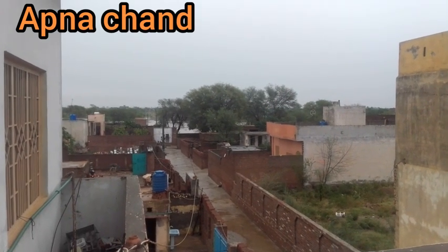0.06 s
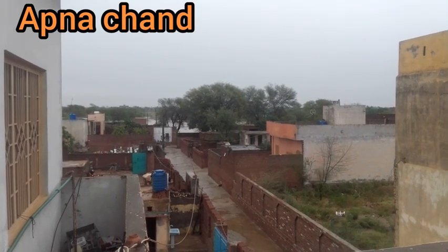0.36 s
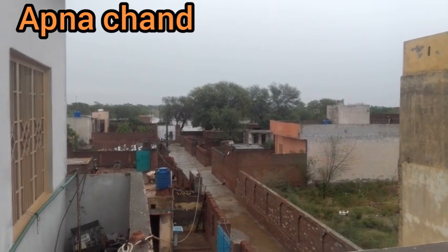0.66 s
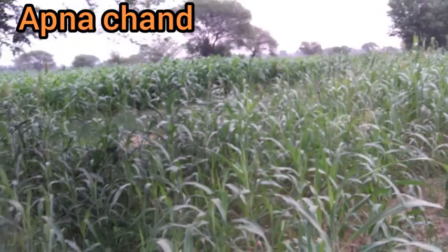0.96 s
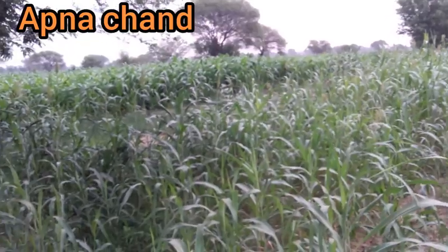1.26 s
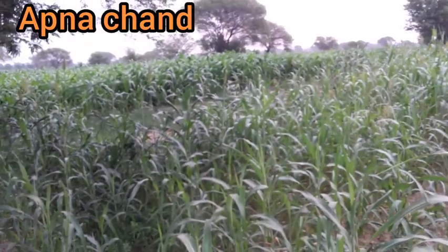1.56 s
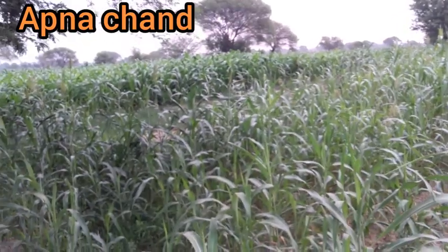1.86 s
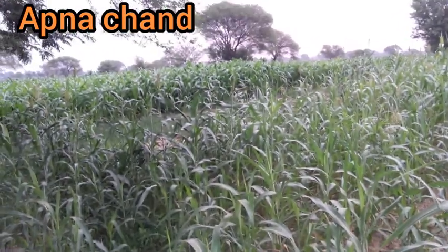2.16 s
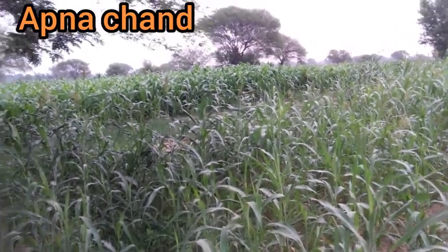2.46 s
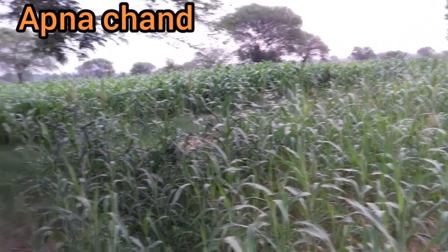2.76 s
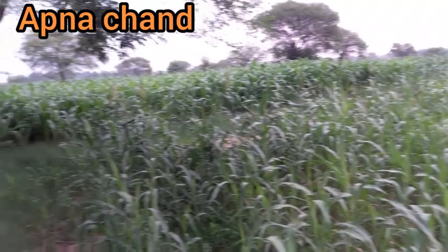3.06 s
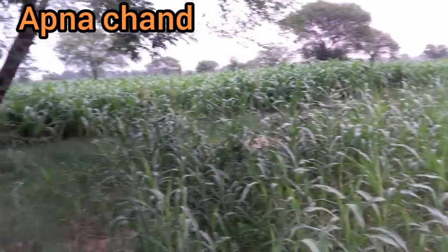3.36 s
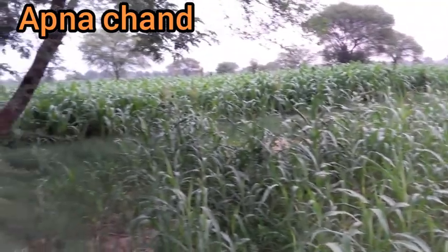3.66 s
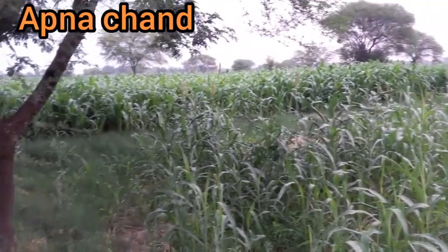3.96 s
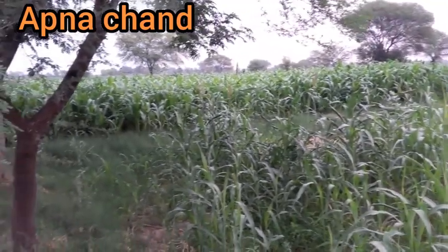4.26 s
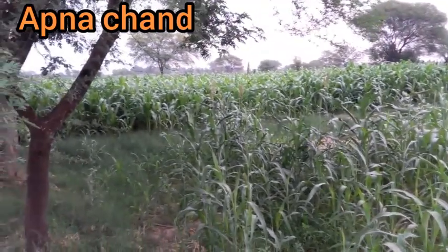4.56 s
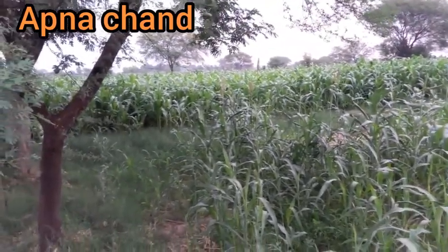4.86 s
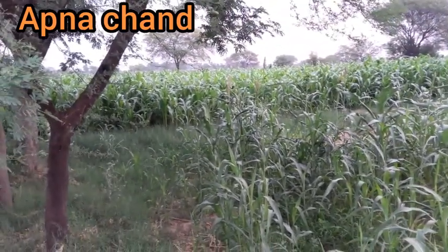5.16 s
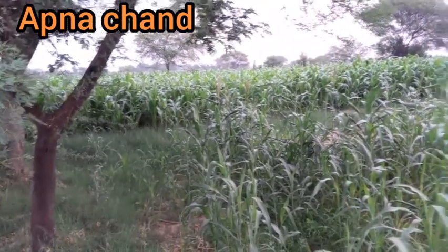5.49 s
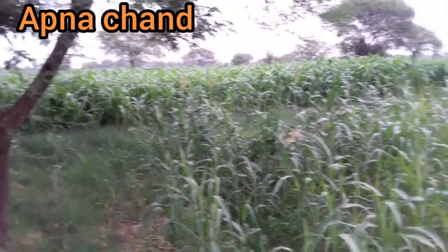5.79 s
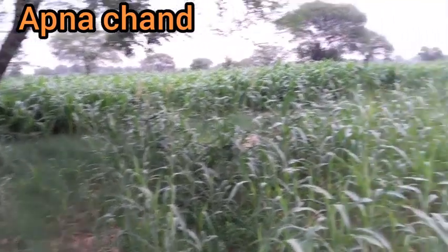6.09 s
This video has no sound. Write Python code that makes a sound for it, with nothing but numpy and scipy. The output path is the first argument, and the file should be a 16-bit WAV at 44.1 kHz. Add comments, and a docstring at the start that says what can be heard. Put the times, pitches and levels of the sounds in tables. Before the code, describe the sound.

After a brief windy village din stops abruptly, crows caw near and far in a field with quiet insects and high trills.

```python
"""Village rooftop, then crows in a crop field

A far drone wavers, wind thumps the microphone and small birds chirp, until the sound cuts off.
A field fades in: a crow caws close by and others answer from farther off, pulses ringing their throats,
over buzzing insects, high trills, thin whistles and a few taps. Noise reduction hushes the pauses."""
import sys
import numpy as np
from scipy import signal
from scipy.fft import rfft, irfft, next_fast_len
from scipy.io import wavfile
from scipy.ndimage import uniform_filter1d, map_coordinates

SR = 44100
rng = np.random.default_rng(int(sys.argv[2]) if len(sys.argv) > 2 else 0)


def inscribe(sig):
    """Save sig as 16-bit PCM at rate SR to the path in sys.argv[1].

    A 1-D sig is mono; a 2-D sig holds one channel per row.
    Samples are clipped to [-1, 1] before scaling.
    """
    pcm = np.round(np.clip(np.atleast_2d(sig).T, -1, 1) * 32767)
    wavfile.write(sys.argv[1], SR, pcm.astype(np.int16))


N = 270156
CUT_S, FADE_START_S, FADE_END_S = .857, 1.142, 1.39


def amp(db):
    return 10 ** (np.asarray(db) / 20)


def unit_rms(x):
    return x / np.sqrt(np.mean(x ** 2) + 1e-20)


def clock():
    return np.arange(N) / SR


def along(points, hz):
    """Interpolate (Hz, value) points on a log axis."""
    freqs, values = np.transpose(points)
    return np.interp(np.log(hz + 1), np.log(freqs + 1), values)


def gate(start_s, end_s, edge_s):
    """1 between two times, with sloping edges outside them."""
    return np.clip(1 + np.minimum(clock() - start_s, end_s - clock()) / edge_s, 0, 1)


def wobble(knots_per_s):
    """A smooth random curve."""
    return map_coordinates(rng.standard_normal(int(N * knots_per_s / SR) + 4), [clock() * knots_per_s])


def filtered(x, response):
    """Apply a complex gain, given as a function of Hz."""
    size = next_fast_len(N + SR // 2)
    return irfft(rfft(x, size) * response(np.fft.rfftfreq(size, 1 / SR)), size)[:N]


def noise(spectrum):
    """Noise of rms 1, coloured by (Hz, dB) points."""
    return unit_rms(filtered(rng.standard_normal(N), lambda hz: amp(along(spectrum, hz))))


def tone(hz):
    """A sine of rms 1 on a pitch curve."""
    return np.sqrt(2) * np.sin(2 * np.pi * np.cumsum(hz) / SR)


def add(track, at_s, sound):
    start = int(np.clip(round(at_s * SR), 0, N))
    track[start:start + len(sound)] += sound[:N - start]


# Each row: frequency in Hz, seconds for the echo to fall 60 dB at size 1.
SCATTER_DECAY = [(300, 0.1), (2000, 0.64), (10000, 0.048)]

def outdoors(x, wet_db, size=1):
    """Direct sound plus its scatter from trees and walls, at about the same power."""
    hz, t, spectra = signal.stft(rng.standard_normal(SR // 2), SR, nperseg=256)
    t60_s = size * along(SCATTER_DECAY, hz)[:, None]
    tail = signal.istft(spectra * amp(-60 * t / t60_s), SR, nperseg=256)[1]
    echo = signal.fftconvolve(x, tail / np.linalg.norm(tail))[:N]
    return (x + amp(wet_db) * echo) / np.hypot(1, amp(wet_db))


# Each row: frequency in Hz, relative density in dB.
DIN_SPECTRUM = [(40, -40.5), (120, 5), (500, -8), (900, -11.5), (1400, -12), (1800, -8), (2100, 1.5),
                (2340, -3.5), (2500, -16), (3300, -21), (4500, -25.5), (7000, -37), (15500, -30.5)]

def village_din():
    """The steady wash of the village."""
    return amp(-44.5) * noise(DIN_SPECTRUM)


# Each row: time in seconds, pitch in Hz.
DRONE_PITCH = [(0.08, 397.6), (0.118, 404.6), (0.15, 394.4), (0.468, 376.4), (0.526, 383.8), (0.78, 387.7),
               (0.82, 378.5)]
# Each row: harmonic number, relative level in dB.
DRONE_HARMONICS = [(2, -7), (3, 0), (4, -8), (5, -13), (6, -7.5), (7, -18)]
# Each row: start and end in seconds, pitch in Hz, level in dB, its octave's relative level in dB.
HUMS = [(0, .2, 523, -50.5, -20), (.24, 0.357, 520, -56, -17), (0.438, 0.711, 453.2, -52, -18),
        (.73, .86, 432.2, -54, 1)]

def drone(held_db=-48.5, swell_db=8, swell_s=.33, echo_s=.13):
    """A far drone and lower hums waver and beat against their late echoes from the houses."""
    hz = np.interp(clock(), *np.transpose(DRONE_PITCH)) * (1 + .009 * wobble(28))
    envelope = amp(held_db - swell_db * np.clip(1 - clock() / swell_s, 0, 1))
    direct = envelope * sum(amp(db + 2.2 * wobble(16.3)) * tone(k * hz) for k, db in DRONE_HARMONICS)
    waver = 1 + .011 * wobble(22)
    for start, end, hum_hz, db, octave_db in HUMS:
        hum = tone(hum_hz * waver) + amp(octave_db) * tone(2 * hum_hz * waver)
        direct += amp(db) * gate(start, end, .03) * hum
    echo = amp(-10) * np.pad(direct, (int(echo_s * SR), 0))[:N]
    return outdoors(direct + echo, wet_db=-11)


def eddy(db, hz):
    """One low, quickly damped push of air."""
    cycles = hz * np.arange(SR // 20) / SR
    envelope = (1 - np.exp(-cycles / .094)) * np.exp(-(cycles / .98) ** 2)
    return amp(db + 2.5) * envelope * np.sin(2 * np.pi * cycles)


# Each row: frequency in Hz, relative density in dB.
RUMBLE_SPECTRUM = [(40, -45), (75, -2), (120, 8), (270, 2), (500, -10.5), (900, -48.5)]
# Each row: start in seconds, strength in dB, pitch in Hz, flutter in seconds, flutter strength in dB.
GUSTS = [(.158, -21.5, 243, .056, -21), (.391, -18.5, 235, .025, -25), (.503, -26.5, 173, .012, -32.5),
         (.563, -13.5, 242, .04, -22), (.755, -25.5, 229.3, .045, -31)]

def wind(eddy_gap_s=.0088, pitch_spread=.3):
    """Each gust thumps the microphone once, then flutters in weaker eddies, over a rumble."""
    pushes, wakes = np.zeros(N), np.zeros(N)
    t = np.arange(SR // 10) / SR
    for start, db, hz, flutter_s, flutter_db in GUSTS:
        add(pushes, start, eddy(db, hz))
        add(wakes, start, amp(db - 17 - 60 * t / .12))  # turbulence trails each gust
        for k, (late, size, pitch) in enumerate(rng.standard_normal((8, 3)), 1):
            if k * eddy_gap_s < flutter_s:
                flutter = eddy(flutter_db - 2 + size, hz * np.exp(pitch_spread * pitch))
                add(pushes, start + k * eddy_gap_s + .0022 * late, flutter)
    thumps = filtered(pushes, lambda hz: (1j * hz / (55 + 1j * hz)) ** 3)  # low cut
    rumble = (amp(-45 + 2 * wobble(18)) + wakes) * noise(RUMBLE_SPECTRUM)
    return filtered(thumps + rumble, lambda hz: 1 / (1 + (hz / 1000) ** 4))  # moving air has no sharp edges


def chip(top_hz, end_hz, length_s):
    """One tiny falling note."""
    u = np.linspace(0, 1, max(int(length_s * SR), 8))
    hz = (top_hz + (end_hz - top_hz) * u) * rng.normal(1, .012)
    return tone(hz) * np.sin(np.pi * u)


def ticking_bird(first_s=.046, period_s=.107, gap_s=.02):
    """A small bird ticks in threes."""
    out = np.zeros(N)
    for start in np.arange(first_s, CUT_S, period_s):
        for k in range(3):
            add(out, start + k * gap_s, amp(rng.normal(-68.5, 1.93)) * chip(6400, 5800, .012))
    return out


# Each row: start and length in seconds, first and last pitch in Hz, relative level in dB.
WHISTLES = [(.312, .035, 3300, 5540, -58.5), (.352, .034, 4050, 3600, -51.5), (.39, .045, 4050, 5000, -57),
            (3.87, .115, 2600, 1950, -72.5), (3.92, 0.065, 3500, 3450, -78),
            (5.714, 0.056, 3730, 3250, -75), (5.93, 0.1, 3335, 2450, -76)]

def whistles(glide_power=2.2):
    """Thin notes of small birds hold their pitch, then bend away ever faster."""
    out = np.zeros(N)
    for start, length, first_hz, last_hz, db in WHISTLES:
        u = np.clip((clock() - start) / length, 0, 1)
        quaver = .004 if start > CUT_S else .035  # the village bird is harsher
        hz = (first_hz + (last_hz - first_hz) * u ** glide_power) * (1 + quaver * wobble(400))
        out += amp(db) * tone(hz) * np.clip(3 * np.sin(np.pi * u), 0, 1)
    return outdoors(out, wet_db=-5)


# Each row: centre in Hz, width in Hz, level in dB.
INSECT_BANDS = [(4926, 585, -68), (7590, 870, -68.5), (9990, 780, -72.5)]

def insects(chirps_per_s=10.5):
    """Insect choruses flutter in narrow bands; one cricket chirps evenly among them."""
    chorus = np.zeros(N)
    for centre, width, db in INSECT_BANDS:
        band = filtered(rng.standard_normal(N), lambda hz: 1 / (1 + ((hz - centre) / width) ** 2) ** 2)
        chorus += unit_rms(band) * amp(db + 1.5 * wobble(45))
    chirps = np.sin(np.pi * (chirps_per_s * clock() + .15 * wobble(3))) ** 6
    cricket = amp(-72.5) * chirps * noise([(4900, -54), (5250, -2), (5600, -50)])
    return chorus + cricket


# Each row of both: frequency in Hz, relative density in dB.
AIR_SPECTRUM = [(30, -16), (150, -5.5), (500, -0.5), (1900, -6.5), (3200, -15), (6000, -31)]
HISS_SPECTRUM = [(1500, -11.5), (3500, -4), (6000, -3.5), (11000, 3)]

def field_air():
    """Open air, wavering slightly, and a faint hiss."""
    return amp(-62 + wobble(6.9) / 2) * noise(AIR_SPECTRUM) + amp(-67) * noise(HISS_SPECTRUM)


# Each entry: start of a trill in seconds.
TRILL_STARTS_S = [1.1, 1.683, 2.362, 2.983, 3.61, 4.282, 4.875, 5.43, 6.04]

def trills(length_s=.265, rise_db=8, slowing=.32):
    """Runs of falling chips that slow down and grow louder toward their end."""
    out = np.zeros(N)
    for start in TRILL_STARTS_S:
        for u in np.linspace(0, 1, 14):
            at_s = start + length_s * (u - slowing * u * (1 - u))
            db = rng.normal(-56, 1.06) - rise_db * (1 - u) ** 2
            add(out, at_s, amp(db) * chip(5227, 4203, .0156))
    return outdoors(out, wet_db=-1.5, size=.55)


def rattle(pulse_hz, fray, jitter_s, rasp_share, lead_db):
    """A crow's voice: pulse pairs and pulsed rasp, looser and hoarser as it frays."""
    cycle = np.cumsum(pulse_hz) / SR
    beats_s = np.interp(np.arange(1, int(cycle[-1])), cycle, clock())
    spread_s = jitter_s * (1 + 4 * np.interp(beats_s, clock(), fray))
    pulses = np.zeros(N)
    for lead_s, db in ((0, 0), (.0046, lead_db)):  # a weaker pulse just before each main one
        slip, scatter_db = rng.standard_normal((SR // 50, 2))[:len(beats_s)].T
        samples = np.clip((beats_s - lead_s + spread_s * slip) * SR, 0, N - 1).astype(int)
        pulses += np.bincount(samples, amp(db + scatter_db), N)
    rasp = unit_rms(rng.standard_normal(N) * np.exp(-2 * (cycle % 1)))
    share = np.clip(rasp_share + fray / 2, 0, 1)
    voice = np.sqrt(1 - share) * unit_rms(pulses) + np.sqrt(share) * rasp
    voiced = lambda hz: 1 / (1 + (hz / 2900) ** 12)  # above the resonances only rasp is left
    return filtered(voice, voiced) + filtered(rasp, lambda hz: 1 - voiced(hz))


# Each row: frequency in Hz, relative gain in dB.
CAW_COLOUR = [(200, -24), (600, -4.5), (1050, -3), (1600, -2.5), (2400, -1), (3300, -7.5), (5800, 2),
              (9000, -11)]

def ring_throat(voice, throat, stretch):
    """The voice rings the throat's resonances, their frequencies scaled by stretch."""
    def response(hz):
        f = hz / stretch
        ring = sum((-1) ** k * amp(db) * 1j * f * width / (centre ** 2 - f ** 2 + 1j * f * width)
                   for k, (centre, width, db) in enumerate(throat))
        sweep = np.exp(-1j * np.pi * (hz / 620) ** 2)  # each pulse's lows come first
        return ring * amp(along(CAW_COLOUR, hz)) * sweep
    return unit_rms(filtered(voice, response))


def caw(row, throat, sag_hz_per_s=33, arch_s=.05, closing_hz=8.5, **texture):
    """The pitch arches, the resonances rise with it as the beak opens, and the end frays."""
    start, length, top_hz, top_s, db, attack, swell, release = row
    t = np.clip(clock() - start, 0, length)
    sag_hz = sag_hz_per_s * (np.hypot(t - top_s, arch_s) - arch_s)
    edges = np.clip(t / attack, 0, 1) * np.clip((length - t) / release, 0, 1)
    envelope = amp(db + swell * (t - attack)) * np.sin(edges * np.pi / 2) ** 1.61
    voice = rattle(top_hz - sag_hz, fray=(t / length) ** 5, **texture)
    opening = np.sin(np.clip(1 - sag_hz / closing_hz, 0, 1) * np.pi / 2) ** 2
    stretch = np.sqrt(top_hz / 78)  # a lower call has a darker throat
    beak_open = ring_throat(voice, throat, stretch)
    beak_closed = ring_throat(voice, throat, .957 * stretch)
    return envelope * (opening * beak_open + (1 - opening) * beak_closed)


# Each row of both: resonance and width in Hz before stretching, gain in dB.
NEAR_THROAT = [(780, 88, -14), (1191, 80, -8), (1468, 114, -5), (1620, 77, 1.5), (1698, 78.5, 3),
               (2025, 58, -4), (2144, 78, -13.5), (2510, 42, -25)]
FAR_THROAT = [(600, 66, -6), (910, 200, -9.5), (1380, 270, -3.5), (1627, 82, 5), (2004, 148, 2.5),
              (2138, 198, -6)]
# Each row: crow, start and length in seconds, top pulse rate in Hz, seconds to that top,
# level in dB, attack in seconds, swell in dB per second, release in seconds.
CAWS = [ ("near", 1.2206, 0.39, 77.4, .188, -34, 0.22, 19.6, 0.058),
        ("far", 1.848, 0.51, 79.8, .09, -47.5, 0.16, -19, 0.24),
        ("farthest", 2.38, 0.35, 78, .12, -66.5, 0.057, -12, .08),
        ("far", 2.871, 0.44, 74.2, .11, -47, 0.2, -15.5, .21),
        ("farthest", 3.51, 0.35, 78, .12, -63.5, 0.095, -15, .12),
        ("farthest", 5.62, 0.55, 78, .2, -70, .11, -1, .08)]

def crows():
    """The near crow is clear and almost dry; the far ones are hoarser, blurred by the trees."""
    def calls(crow, throat, **texture):
        return sum(caw(row, throat, **texture) for who, *row in CAWS if who == crow)
    near = calls("near", NEAR_THROAT, jitter_s=.00002, rasp_share=.05, lead_db=-5)
    far = calls("far", FAR_THROAT, jitter_s=.00005, rasp_share=.32, lead_db=-3)
    farthest = calls("farthest", FAR_THROAT[3:], jitter_s=.0001, rasp_share=.51, lead_db=-8)
    return outdoors(near, wet_db=-15, size=.45) + outdoors(far + farthest, wet_db=-3, size=.7)


# Each row: middle of the first buzz in seconds, number of buzzes, relative level in dB.
BUZZ_BOUTS = [(1.45, 3, -60), (2.465, 4, -60), (3.655, 2, -61), (4.318, 2, -64.5), (5.85, 2, -64.5)]

def buzzes(period_s=.286, half_length_s=.043):
    """Very high rasps in bouts, each a fast train of clicks arching down in pitch."""
    out = np.zeros(N)
    for first_s, count, db in BUZZ_BOUTS:
        for middle_s in first_s + period_s * np.arange(count):
            for u in np.linspace(-1, 1, 17):
                hz = 8100 - 400 * (u + .45) ** 2
                click_db = db + 4 - 4.6 * u ** 2 + rng.normal(0, 1.3)
                add(out, middle_s + half_length_s * u, amp(click_db) * chip(hz + 600, hz - 600, .003))
    return out


# Each row: start and end in seconds, level in dB, pitch in Hz, spacing in seconds, surge in dB.
CHATTER_RUNS = [(1.628, 3.05, -66, 7180, .012, 4.5), (5.779, 6, -61.5, 4380, 0.027, 0)]

def chatter(surges_per_s=11):
    """Runs of fast, loose ticking; a surging level bunches the ticks."""
    out = np.zeros(N)
    for start, end, db, hz, spacing, surge_db in CHATTER_RUNS:
        for at_s in np.arange(start, end, spacing):
            tick_db = db + surge_db * np.cos(2 * np.pi * surges_per_s * at_s) + rng.normal(0, 1.2)
            add(out, at_s + rng.normal(0, .003), amp(tick_db) * chip(hz + 650, hz - 650, .0071))
    return out


# Each row: time of the peak in seconds, level in dB.
TAPS = [(4.735, -57), (5.61, -54.5), (5.644, -51)]

def taps(t60_s=.037):
    """A few soft, dry taps close by."""
    envelope = sum(amp(db - 60 * np.abs(clock() - at_s) / t60_s) for at_s, db in TAPS)
    return envelope * noise([(600, -12), (1200, -3), (3000, -17), (8000, -38.5)])


def noise_reduction(x, open_db=-50, depth_db=2.5, slope=.67):
    """Turns the sound down whenever it is quiet, so the air swells with each call."""
    level_db = 10 * np.log10(np.abs(uniform_filter1d(x ** 2, SR // 10)) + 1e-20)
    return x * amp(np.clip(slope * (level_db - open_db), -depth_db, 0))


def scene():
    """The rooftop cuts off; after a silence the field fades in."""
    birds = whistles()
    rooftop = village_din() + drone() + wind() + ticking_bird() + birds
    buzzing = outdoors(buzzes() + chatter(), wet_db=-5.5)
    field = insects() + field_air() + trills() + buzzing + taps() + amp(3) * birds
    fade_in = np.clip((clock() - FADE_START_S) / (FADE_END_S - FADE_START_S), 0, 1) ** 2
    return (gate(0, CUT_S, .007) * rooftop + noise_reduction(fade_in * field + crows()))[None]


def record(dry):
    """The camera keeps nothing above its band limit."""
    return filtered(dry[0], lambda hz: hz < 15850)[None]


dry = scene()
out = record(dry)
inscribe(out)
```